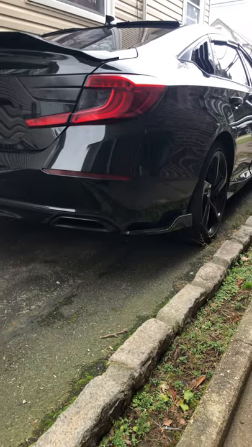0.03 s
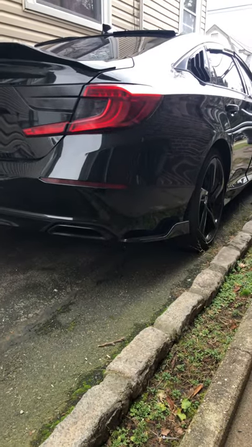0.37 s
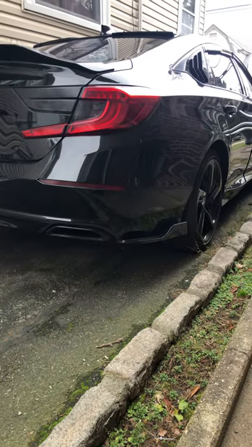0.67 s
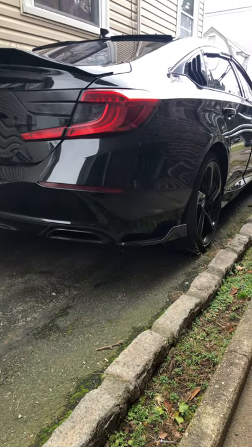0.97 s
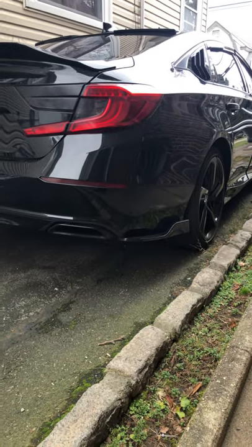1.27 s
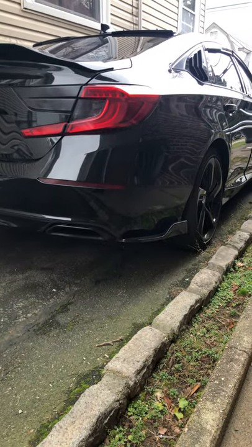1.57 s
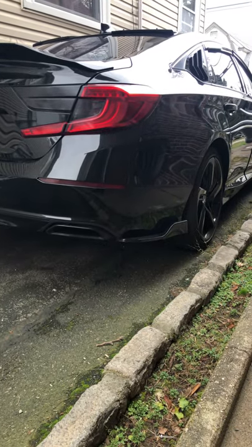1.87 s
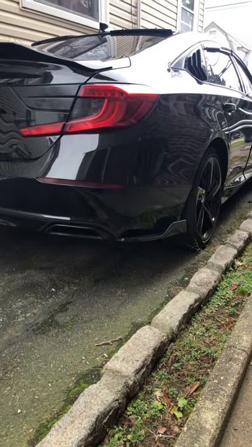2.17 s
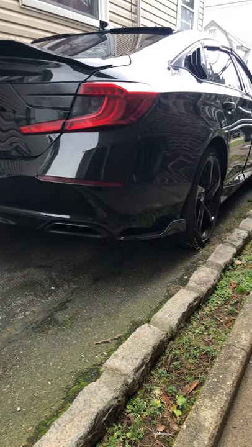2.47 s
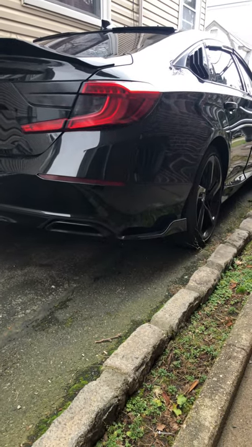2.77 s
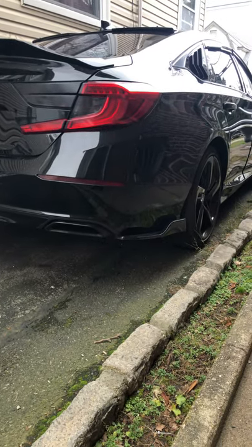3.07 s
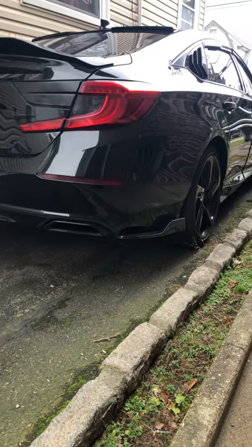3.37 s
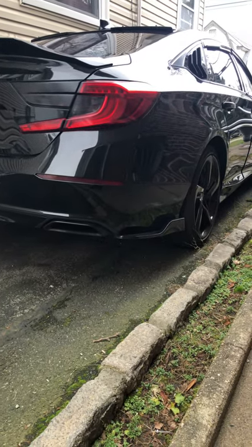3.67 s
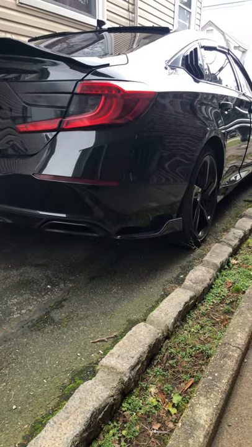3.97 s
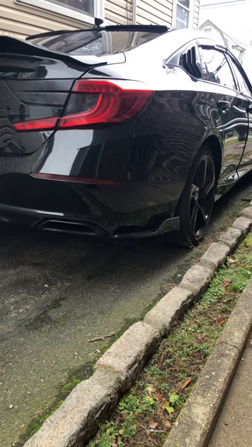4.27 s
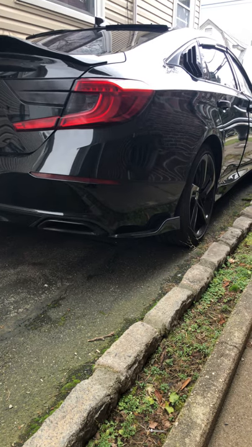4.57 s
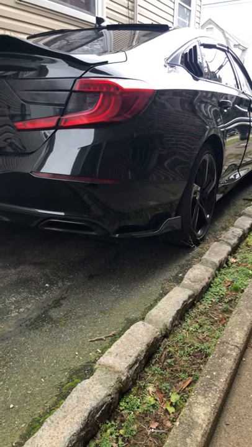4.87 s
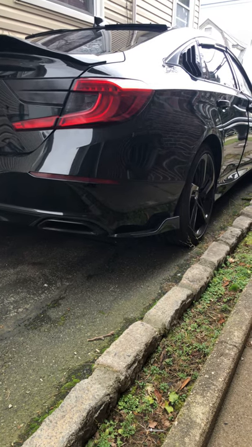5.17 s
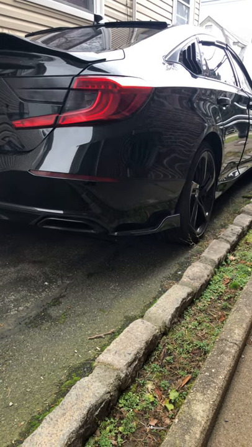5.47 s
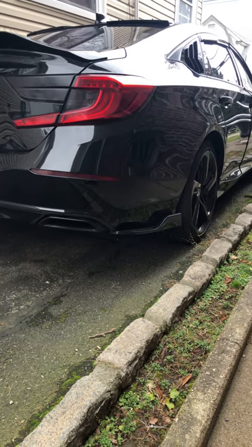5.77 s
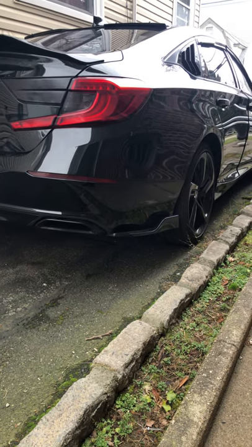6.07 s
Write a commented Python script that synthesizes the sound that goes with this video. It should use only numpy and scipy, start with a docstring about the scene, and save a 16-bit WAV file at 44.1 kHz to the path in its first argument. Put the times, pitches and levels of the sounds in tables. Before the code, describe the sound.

Low, slightly wavering exhaust hum of a parked car idling, with a light rumble, faint whistle and ticking hiss.

```python
"""A low, slightly unsteady drone with soft puffs, a faint whistle and a ticking hiss behind it.
It is a four-cylinder car idling on a driveway, heard from a few steps behind its sports exhaust.
The firings drone in the pipe as the idle speed drifts up and down. Each pushes out a puff of gas,
and the gas also whistles. Uneven burning adds a rumble; valves tick and hiss in the engine bay."""
import sys
import numpy as np
from scipy import signal
from scipy.fft import rfft, irfft
from scipy.io import wavfile
from scipy.ndimage import uniform_filter1d

SR = 44100
rng = np.random.default_rng(int(sys.argv[2]) if len(sys.argv) > 2 else 0)


def waveform_to_disk(signal):
    """Save audio, clipped to [-1, 1], as 16-bit WAV at the path in sys.argv[1]."""
    frames = np.transpose(np.atleast_2d(signal))
    scaled = np.clip(frames, -1, 1) * 32767
    samples = np.round(scaled).astype(np.int16)
    wavfile.write(sys.argv[1], SR, samples)


N = 274743


def undb(db):
    """Turn decibels into a gain."""
    return 10 ** (np.asarray(db) / 20)


def unit(x):
    """Scale a signal to an average (rms) size of 1."""
    return x / np.sqrt(np.mean(x ** 2))


def curve(table):
    """Join (time, value) points with straight lines."""
    times, values = np.transpose(table)
    return np.interp(np.arange(N) / SR, times, values)


def walk(rate):
    """A smooth random wander of size 1, taking `rate` steps a second."""
    hold = max(int(SR / rate), 1)
    steps = rng.standard_normal(8192)[np.arange(N) // hold % 8192]
    return unit(uniform_filter1d(uniform_filter1d(steps, hold), hold))


def colour(x, points):
    """Shape a sound's lows and highs by (frequency [Hz], relative level [dB]) points."""
    hz, db = np.transpose(points)
    freqs = np.fft.rfftfreq(N, 1 / SR) + 1
    gain = undb(np.interp(np.log(freqs), np.log(hz), db))
    return unit(irfft(rfft(x) * gain, N))


def resonate(x, hz, width):
    """Make a sound ring near one pitch; filtering twice shuts out more of the rest."""
    b, a = signal.iirpeak(hz, hz / width, fs=SR)
    return unit(signal.lfilter(b, a, signal.lfilter(b, a, x)))


def per_cycle(phase):
    """A random value for each cycle, blended from one to the next."""
    return np.interp(phase, np.arange(1024), rng.standard_normal(1024))


def bursts(phase, length):
    """A level that jumps once a cycle and dies away over a share of it."""
    return unit(np.exp(-(phase % 1) / length))


def wall_echo(sound, decay_s=0.012):
    """Scattered echoes come from under the car and off the house wall."""
    t = np.arange(8192) / SR
    echoes = rng.standard_normal(len(t)) * t * np.exp(-t / decay_s)
    return unit(signal.fftconvolve(sound, echoes)[:N])


def engine_bay(phase, gain_db=4.5, hiss_db=-55, tick_db=-1, echo_db=-8, scatter_db=3, grain_db=6):
    """Valves and injectors tick twice a firing over a hiss; metal parts ring and the wall echoes."""
    # the sizzle from 2900 to 7500 Hz: (time [s], relative level [dB])
    sizzle = [(0.0, -54.5), (0.3, -56.0), (0.6, -54.0), (0.8, -55.0), (0.9, -52.5), (1.6, -55.5),
              (1.8, -55.0), (2.4, -54.0), (2.7, -55.0), (2.9, -53.5), (3.1, -55.0), (3.2, -52.5),
              (3.5, -56.0), (3.6, -54.0), (6.23, -55.5)]
    # tone colour of the engine bay: (frequency [Hz], relative level [dB])
    hiss_colour = [(300, 14), (1400, 1), (1600, 2), (2400, 1), (2850, -5), (3600, -0.5), (4900, -1),
                   (5900, -5), (7000, -5.5), (8200, -5), (9400, -10), (11500, -7), (14000, -6.5),
                   (15700, -11)]
    # ringing metal parts: (frequency [Hz], width [Hz], relative level [dB])
    metal_parts = [(1880, 180, -16), (2274, 490, -12.5), (3480, 105, -17.5), (3935, 260, -17),
                   (4360, 150, -19.5), (5290, 41, -17.5), (5660, 250, -15), (6170, 220, -17),
                   (8200, 770, -23)]
    sizzle_db = curve(sizzle)
    level = lambda hz: undb(sizzle_db if 2900 <= hz < 7500 else hiss_db)
    beat = bursts(phase, length=0.68) + bursts(2 * phase, length=0.68)
    edges_hz = [300, 1400, 2900, 5000, 7500, 11000, 18000]
    freqs = np.fft.rfftfreq(N, 1 / SR)
    hiss = metal = 0
    for low, high in zip(edges_hz, edges_hz[1:]):
        # parts of different size tick with their own strength
        uneven_db = scatter_db * np.tanh(per_cycle(2 * phase)) + grain_db * np.tanh(walk(1500))
        ticks = unit(beat * undb(uneven_db))
        noise = rng.standard_normal(N) + undb(tick_db) * ticks * rng.standard_normal(N)
        flicker = undb(0.86 * walk(9))
        in_band = (freqs >= low) & (freqs < high)
        hiss += irfft(rfft(noise * flicker * level(low)) * in_band, N)
    for hz, width, db in metal_parts:
        gain = level(hz) * undb(db + 2 * walk(14))
        metal += gain * resonate(beat * rng.standard_normal(N), hz, width)
    sound = undb(hiss_db) * colour(hiss, hiss_colour) + metal
    return undb(gain_db) * (sound + undb(hiss_db + echo_db) * wall_echo(sound))


def rumble():
    """Uneven burning makes the pipe and the car body ring at low pitches."""
    # where pipe and body ring: (frequency [Hz], width [Hz], level [dB])
    low_rings = [(19.7, 70, -64), (68.6, 17, -46.5), (135.3, 25, -45.5), (334, 56, -46.5), (385.8, 26, -48)]
    return sum(undb(db) * resonate(rng.standard_normal(N), hz, width) for hz, width, db in low_rings)


def gas_puffs(phase, strength, stray_hz, base_db=-42, db_per_hz=-0.6, db_per_s=0.17, scatter_db=1.3):
    """A puff of swirling gas follows each firing, louder when the engine labours below idle speed."""
    # tone colour of the puffs: (frequency [Hz], relative level [dB])
    puff_colour = [(330, -14), (420, -1.5), (520, -1), (590, -3.5), (740, -5), (900, -1), (990, -9.5),
                   (1040, -1), (1110, -9.5), (1190, -5), (1280, -18), (1500, -30), (2500, -36)]
    flow_db = base_db + db_per_hz * stray_hz + db_per_s * np.arange(N) / SR + 0.8 * walk(8.7)
    # each puff swells and closes off, on top of a steady flow
    flow = 0.25 + np.abs(np.cos(np.pi * (phase + 0.046))) ** 0.74
    alternation = 1 + 0.21 * np.cos(np.pi * phase)  # every other puff is stronger
    push = unit(flow * alternation * undb(scatter_db * np.tanh(strength)))
    return undb(flow_db) * colour(push * rng.standard_normal(N), puff_colour)


def gas_whistle(pitch_hz=1023, waver_hz=5.5, flutter_db=2, swell_db=1.3, gain_db=-1):
    """The escaping gas blows a faint, fluttering whistle."""
    # how the whistle comes and goes: (time [s], relative level [dB])
    loudness = [(0.03, -50), (1.73, -50.5), (2.04, -45), (2.07, -53), (3.05, -48), (3.26, -60), (3.5, -48),
                (5.49, -51), (5.6, -47), (5.63, -52.5), (5.91, -45), (6.2, -56)]
    hz = pitch_hz + waver_hz * walk(50)
    tone = np.sin(2 * np.pi * np.cumsum(hz) / SR)
    flutter = undb(flutter_db * walk(30) + swell_db * walk(9))
    return undb(curve(loudness) + gain_db) * unit(tone * flutter)


def exhaust(phase, strength, stray_hz, lag_s=0.049, reach_hz=0.85, waver_db=0.41, rough_db=-0.37):
    """The firings drone; the strong tones swell and sag as the speed slides them over the pipe's peaks."""
    # strong tones: (multiple of the firing rate, level at idle [dB], slope [dB per Hz of stray],
    # bend [dB per Hz squared], growth [dB per s])
    strong_tones = [(1, -28.5, 0, 1, 0.54), (2, -29.5, 1.35, -1.1, 0.24), (4, -32.5, -.5, -4.5, 0.27),
                    (5, -22, 0.16, 4, 0), (6, -29, -2.5, -0.4, 0), (7, -32.5, 3.5, -7, 0)]
    # weak tones; unequal cylinders give the fractions: (multiple of the firing rate, relative level [dB])
    weak_tones = [(1.5, -41), (2.5, -27.5), (2.75, -33.5), (3, -28.5), (3.75, -32), (5.5, -30),
                  (6.5, -40.5), (7.5, -25), (8, -37.5), (9, -32), (10, -32), (11, -29.5), (12, -31.5),
                  (13, -33), (14, -34.5), (15, -32.5)]
    t = np.arange(N) / SR
    # the pipe answers a change of speed late, and only up to a limit
    late_hz = np.clip(np.interp(t - lag_s, t, stray_hz), -reach_hz, reach_hz)
    tones = []
    for multiple, db, slope, bend, growth in strong_tones:
        pipe_db = slope * late_hz + bend * late_hz ** 2
        tones.append((multiple, db + pipe_db + growth * t + waver_db * walk(14)))
    tones += [(multiple, db - 20) for multiple, db in weak_tones]
    drone = 0
    for multiple, db in tones:
        boom_lag = 0.201 * (multiple < 4)  # the low boom leaves the silencer late
        smear = 0.056 * max(multiple - 7, 0) ** 2  # the pipe smears the high rasp in time
        edge_db = rough_db * strength * (multiple > 6)  # only high tones vary with each firing
        turns = multiple * (phase - boom_lag) - smear
        drone += undb(db + edge_db) * np.cos(2 * np.pi * turns)
    return np.sqrt(2) * drone


def scene(idle_hz=50.82, jitter=0.0038, wobble=0.0051, start_phase=0.67, valve_lead=0.25):
    """One crankshaft times drone, puffs and ticks; no two firings are equally strong or exactly on time."""
    # engine speed: (time [s], firing rate [Hz])
    speed = [(0.0, 51.02), (0.76, 50.73), (1.04, 51.56), (1.12, 50.64), (1.78, 50.88), (1.84, 51.57),
             (2.12, 50.71), (2.26, 51.57), (2.48, 49.9), (2.58, 51.38), (2.76, 51.55), (2.9, 50),
             (3.0, 51.31), (3.42, 50.83), (3.54, 51.6), (3.68, 50.54), (3.88, 51.7), (4.04, 50.36),
             (4.26, 51.37), (4.32, 50.69), (4.9, 50.85), (4.96, 50.06), (5.28, 51.22), (5.36, 50.44),
             (5.78, 51.21), (6.0, 49.74), (6.23, 51.1)]
    phase = start_phase + np.cumsum(curve(speed)) / SR + wobble * walk(14)  # counts the firings
    stray_hz = np.gradient(phase) * SR - idle_hz  # how far the firing rate is from idle
    phase += jitter * per_cycle(phase)
    strength = per_cycle(phase)
    sound = exhaust(phase, strength, stray_hz) + rumble()
    sound += gas_puffs(phase, strength, stray_hz) + gas_whistle()
    sound += engine_bay(phase + valve_lead)
    return sound[None]


def record(dry, fade_s=0.006, top_hz=15750):
    """The sound fades in quickly and loses its highest treble."""
    fade = np.minimum(np.arange(N) / (fade_s * SR), 1)
    treble_cut = signal.ellip(12, 0.1, 90, top_hz, fs=SR, output="sos")
    return signal.sosfilt(treble_cut, dry * fade)


dry = scene()
out = record(dry)
waveform_to_disk(out)
```